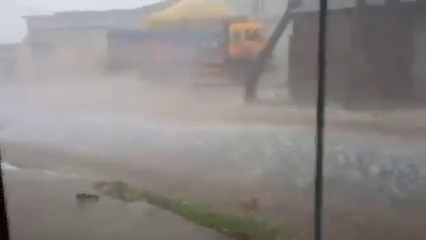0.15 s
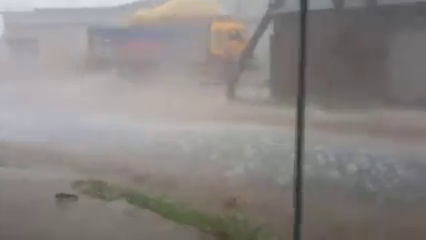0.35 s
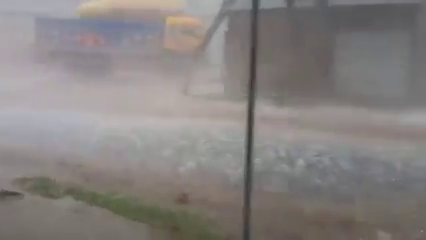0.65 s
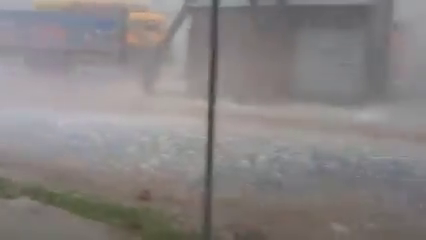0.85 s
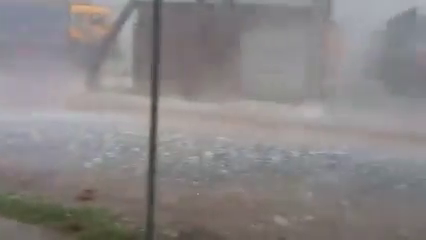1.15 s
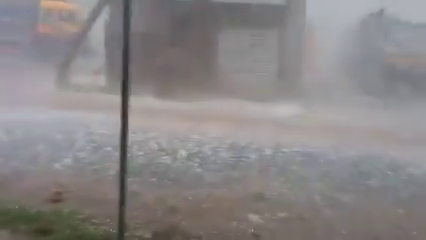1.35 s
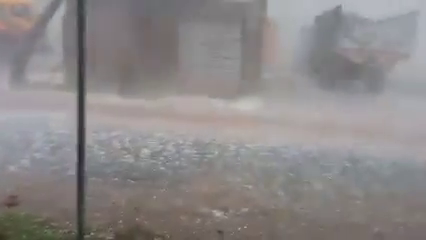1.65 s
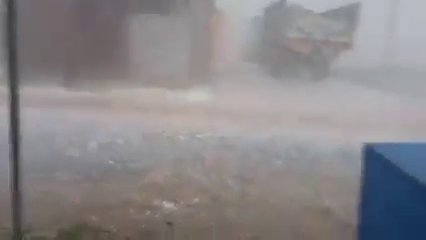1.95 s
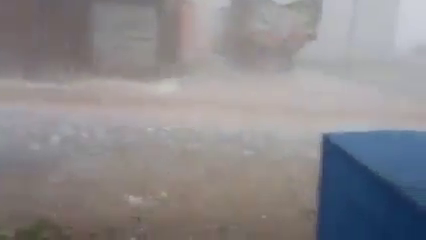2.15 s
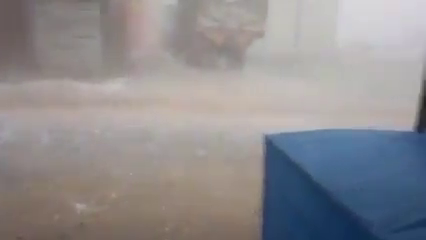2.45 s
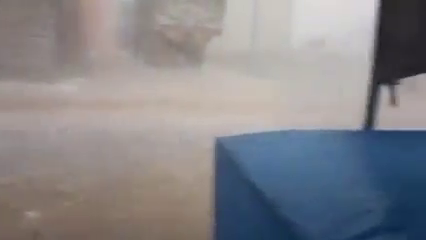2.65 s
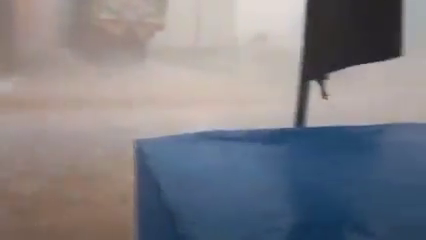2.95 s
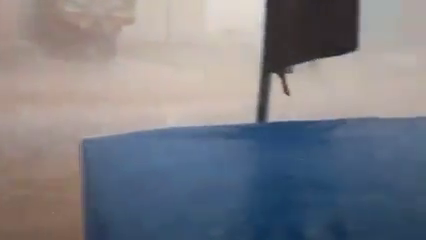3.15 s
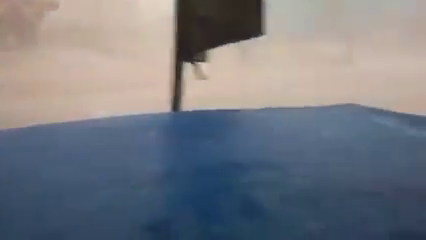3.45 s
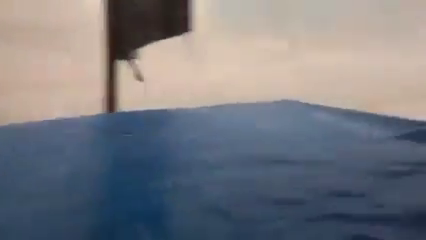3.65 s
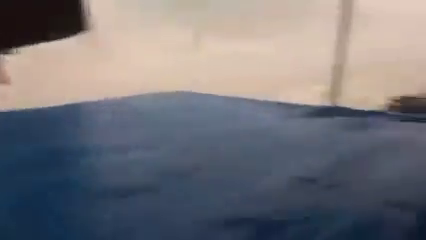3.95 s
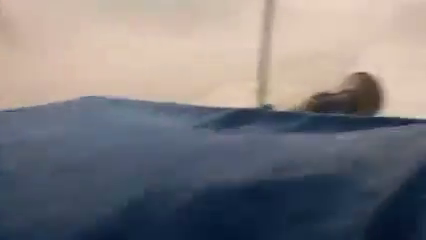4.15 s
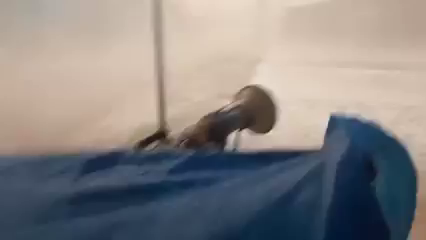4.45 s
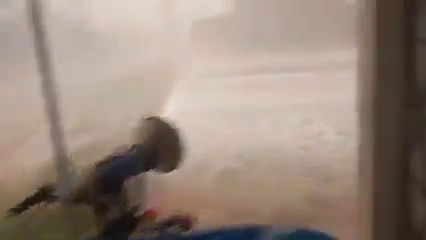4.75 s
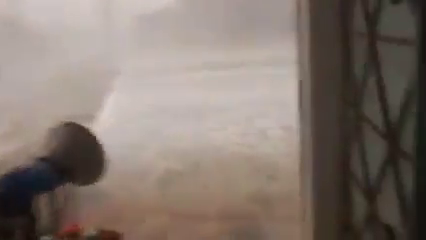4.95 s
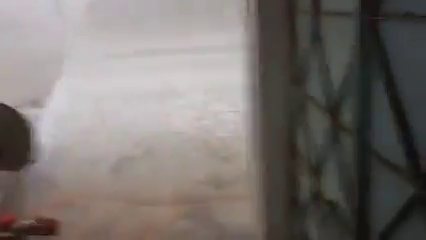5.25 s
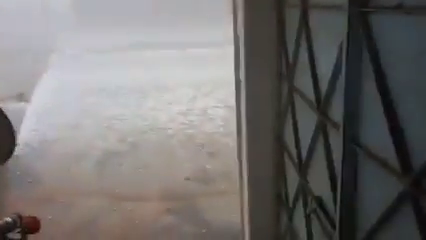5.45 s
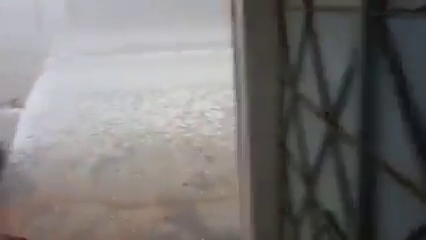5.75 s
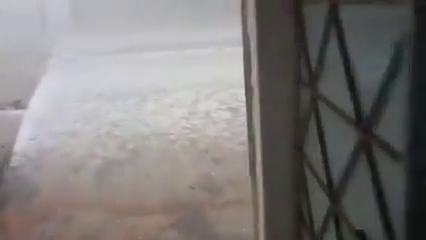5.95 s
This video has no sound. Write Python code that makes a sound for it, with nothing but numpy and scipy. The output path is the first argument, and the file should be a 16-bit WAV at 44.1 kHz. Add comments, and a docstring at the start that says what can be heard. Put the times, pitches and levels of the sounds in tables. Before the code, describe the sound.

A hailstorm is already at full force at 0 seconds: countless stones and drops on yard and roof blend into a dense, grainy mid-range roar, with low roof drumming underneath and a thin, shimmering treble hiss above. It flutters in small gusts but never stops. A dull thud lands near 0.4 seconds, and sparse bright cracks follow among tiny random ticks. A harder knock comes around 2.6, then more at 3.4. Near 4 seconds a deep rumble swells briefly and sinks, with thuds beside it. From about 4.7 the storm eases a little, while close stones hit tarpaulin and door ever more thickly, snapping, knocking and thudding in quick irregular clusters until the abrupt end just after 6 seconds. The stereo image leans clearly right; the handheld microphone sounds coarse, slightly resonant in the upper middle, dulled at the very top and clipped on peaks.

```python
"""The mouth of a sheet-metal shed in a hailstorm that eases in gusts, the balance always leaning right.
Dense random clicks, coloured by spectrum, make the roar on yard and roof, the drumming and a deep rumble;
brief thin tones shimmer in the treble. Noise bursts crack, knock and thud close by. In the upper middle
two narrow resonances dip the left and lift the right; the top is cut and peaks beyond full scale clip."""
import sys
import numpy as np
from scipy import signal
from scipy.fft import rfft, irfft, next_fast_len
from scipy.io import wavfile

SR = 44100
rng = np.random.default_rng(int(sys.argv[2]) if len(sys.argv) > 2 else 0)


def dump(signal):
    """Clip the signal to [-1, 1] and save it as 16-bit WAV at the path in sys.argv[1]."""
    limited = np.clip(np.atleast_2d(signal).T, -1, 1)
    pcm = np.round(limited * 32767).astype(np.int16)
    wavfile.write(sys.argv[1], SR, pcm)


N = 268128


def from_db(db):
    """Amplitude gain of a level in dB."""
    return 10 ** (np.asarray(db) / 20)


def rms_one(x):
    """Scale to rms 1."""
    return x / np.sqrt(np.mean(x ** 2) + 1e-20)


def at_hz(points, hz):
    """Read a spectrum table with straight lines on a log-frequency axis."""
    table_hz, values = np.transpose(points)
    return np.interp(np.log(hz), np.log(table_hz), values)


def in_time(rows):
    """Turn the columns of a timed table into curves over the whole scene."""
    s, *columns = np.transpose(rows)
    return [np.interp(np.arange(N) / SR, s, column) for column in columns]


def drift(corner_hz):
    """Slow random wander of rms 1: noise through two equal one-pole low-passes."""
    step = 40   # samples per control value
    run_in = 2000   # control values
    r = np.exp(-2 * np.pi * corner_hz * step / SR)
    noise = rng.standard_normal(N // step + run_in + 2)
    slow = signal.lfilter([1], [1, -2 * r, r * r], noise)[run_in:]
    return np.interp(np.arange(N) / step, np.arange(len(slow)), rms_one(slow))


def pan(db):
    """Left and right gains for a level difference, left minus right."""
    return from_db(np.array([db / 2, -db / 2]))


def impacts(per_s, spread_db):
    """Three independent showers of clicks, mostly small with a few much larger, of either sign."""
    size_db = spread_db * np.minimum(rng.exponential(1, (3, N)), 3.5)
    clicks = from_db(size_db) * rng.choice([-1, 1], (3, N))
    return clicks * (rng.random((3, N)) < per_s / SR)


def shimmer(low_hz, high_hz, per_s, spread_db):
    """Three swarms of brief thin tones at chance pitches: the treble shimmers, not an even hiss."""
    hop, size = 256, 2048   # samples
    peak_s = 0.014   # sets how slowly a tone swells and fades
    steps = np.arange(N // hop + 12)
    slots = np.arange(int(low_hz * size / SR), int(high_hz * size / SR))   # one pitch each
    luck = rng.random((3, len(steps), len(slots))) / (per_s * hop / SR / len(slots))
    struck = luck < 1   # a tone starts here; the smaller the draw, the louder
    loudness = from_db(-spread_db * np.log(np.maximum(luck[struck], .03)))
    start = np.full(luck.shape, 1e-18 + 0j)
    start[struck] = loudness * np.exp(2j * np.pi * rng.random(struck.sum()))

    r = np.exp(-hop / (peak_s * SR))   # a double pole: each tone swells, then fades
    swelling = signal.lfilter([1], [1, -2 * r, r * r], start, axis=1)
    # advancing phase keeps every sine unbroken from step to step
    turning = np.exp(2j * np.pi * np.outer(steps, slots) * hop / size)
    height = np.zeros((3, len(steps), size // 2 + 1), complex)
    height[..., slots] = swelling * turning

    pieces = irfft(height, size)[..., :2 * hop] * np.hanning(2 * hop + 1)[:-1]
    joined = pieces[:, 1:, :hop] + pieces[:, :-1, hop:]
    return joined.reshape(3, -1)[:, -N:]   # the first steps are a run-in


def stereo(sources, spectrum):
    """One source reaches both ports (the left a little late), one each port alone; coloured, mid rms 1."""
    # how much the two ports hear alike: [f/Hz, shared part 0-1]
    likeness = [(100, 0.04), (270, 0.28), (450, 0.52), (800, 0.37), (1200, 0.11), (3000, 0.06), (8000, 0),
                (12000, 0.04)]
    # balance across the spectrum: [f/Hz, left minus right/dB]
    side_tilt = [(60, 4), (125, 3), (250, 4), (700, 5), (1800, 4), (2700, 1), (5000, 4.5), (9800, 5),
                 (13000, 2.7)]
    left_lag_s = .00015
    size = next_fast_len(N)
    hz = np.maximum(np.fft.rfftfreq(size, 1 / SR), 1)
    both, left, right = rfft(sources, size)
    alike = np.clip(at_hz(likeness, hz), 0, 1)
    late = np.exp(-2j * np.pi * hz * left_lag_s)
    shared = np.sqrt(alike) * both * [late, late ** 0]
    pair = shared + np.sqrt(1 - alike) * np.array([left, right])
    inside = (hz > spectrum[0][0]) & (hz < spectrum[-1][0])
    colour = inside * from_db(at_hz(spectrum, hz))
    out = irfft(pair * colour * pan(at_hz(side_tilt, hz)), size)[:, :N]
    return out / out.mean(axis=0).std()


def sheet(sources, spectrum, gust_db):
    """A coloured stereo sheet of sound, thickening and thinning with the gusts."""
    return from_db(gust_db) * stereo(sources, spectrum)


def roof_drum(level_db):
    """The roof drums under the hail: dense clicks coloured toward the low middle."""
    # drumming spectrum: [f/Hz, level/dB per Hz]
    drum_colour = [(18, -54), (30, -40), (71, -6.5), (102, 0), (134, -0.5), (173, -5.5), (254, 0),
                   (900, -5.5), (1170, -30), (1980, -120)]
    return from_db(level_db) * sheet(impacts(3000, 2.87), drum_colour, 0.22 * drift(10.0))


def deep_rumble(level_db):
    """Sparser clicks coloured to the lowest octaves give an uneven rumble."""
    # rumble spectrum: [f/Hz, level/dB per Hz]
    rumble_colour = [(35, -24), (60, -4.5), (100, 3), (135, -5), (180, -25)]
    return from_db(level_db) * sheet(impacts(300, 2.9), rumble_colour, 1.4 * drift(5.0))


def hail_roar(strength_db):
    """Countless stones and drops on yard and roof blend into a mid-range roar."""
    # roar spectrum: [f/Hz, level/dB per Hz]
    roar_colour = [(500, -11.5), (800, -10.5), (1000, -5), (1500, 0.5), (2100, 0), (2600, -9.5),
                   (3300, -15), (4500, -25.5)]
    roar = sheet(impacts(14000, 3.15), roar_colour, 0.52 * drift(8.9))
    return from_db(-17.5 + strength_db) * roar


def lower_shimmer(treble_db, treble_gust):
    """Brief thin tones shimmer from the upper middle to the lower treble."""
    # lower shimmer spectrum: [f/Hz, level/dB per Hz]
    lower_colour = [(1800, -7.5), (2500, 1.5), (3500, -5), (5000, -7.5), (6300, -11.5), (7500, -10.5),
                    (7800, -34)]
    tones = shimmer(1800, 7800, 1900, spread_db=3.5)
    return from_db(-23.5 + treble_db) * sheet(tones, lower_colour, 0.23 * treble_gust)


def upper_shimmer(treble_db, treble_gust):
    """Brief thin tones shimmer at the top, swinging more widely than the lower ones."""
    # upper shimmer spectrum: [f/Hz, level/dB per Hz]
    upper_colour = [(6500, -39), (7700, -3), (9000, 0.5), (10600, -3.5), (11200, -0.5), (13000, 0),
                    (15100, -2), (15250, -12), (16000, -13)]
    follows = 1.2   # dB per dB of treble
    tones = shimmer(6500, 16000, 4000, spread_db=4.0)
    return from_db(-36 + follows * treble_db) * sheet(tones, upper_colour, 0.97 * treble_gust)


def bursts(times, levels_db, rise_s, t60_s):
    """Envelope of sudden bursts: a straight rise times an exponential decay, shared by all."""
    out = np.zeros(N)
    t = np.arange(SR // 4) / SR
    shape = from_db(-60 * t / t60_s) * np.minimum(t / rise_s, 1)
    for s, db in zip(times, levels_db):
        at = round(s * SR)
        out[at:at + len(t)] += from_db(db) * shape[:N - at]
    return out


def small_stones():
    """Envelope of small stones at random: each jumps up at once and decays exponentially."""
    per_s, floor_db, t60_s = 40, -50.5, 0.092
    hits = np.abs(impacts(per_s, spread_db=4.5)[0]) * from_db(floor_db)
    return signal.lfilter([1], [1, -from_db(-60 / (t60_s * SR))], hits + 1e-18)


def near_stones():
    """Stones shatter in bright noise bursts, heavy ones knock and thud; smaller ones fall at random."""
    # stones shattering close by: [t/s, burst level before decay/dB]
    shattering = [(0.2334, -30), (0.415, -26.5), (0.6994, -31.5), (1.2426, -31.5), (1.5534, -24),
                  (1.9784, -35), (2.3294, -32.5), (2.4124, -29), (3.2794, -29), (3.5394, -26),
                  (3.704, -25.5), (3.8018, -24), (4.3814, -29.5), (4.4844, -29), (4.7356, -27.5),
                  (4.8524, -29), (4.9013, -33), (4.9641, -27), (5.01, -29), (5.1033, -29), (5.1794, -30.5),
                  (5.3033, -31.5), (5.3894, -30.5), (5.4176, -27.5), (5.4929, -29), (5.7114, -28.5),
                  (5.755, -21.5), (5.9115, -25.5), (5.9594, -30.5), (5.9798, -27.5), (5.9954, -28)]
    # heavy stones knocking on the tarpaulin and door: [t/s, knock level/dB, thud level/dB]
    heavy = [(0.38, -26, -13), (2.575, -16, -16), (3.403, -12.5, -24), (3.43, -20, -15.5),
             (4.0264, -19, -15), (4.11, -20, -19.5), (4.379, -20, -18), (4.7373, -15, -26),
             (4.7894, -21, -21.5), (4.9, -19, -15), (4.967, -13, -17), (5.01, -18, -20),
             (5.102, -12.5, -10), (5.179, -15, -12), (5.376, -21, -16), (5.394, -14, -20),
             (5.416, -14, -13.5), (5.4924, -18, -16), (5.6544, -14, -22.5), (5.7525, -15.5, -15),
             (5.8804, -14, -20.5), (5.912, -11, -20.5), (5.9607, -12.5, -26), (5.995, -15.5, -17.5),
             (6.051, -15, -20)]
    # bright shatter spectrum: [f/Hz, level/dB per Hz]
    crack_colour = [(5000, -7), (8000, -4), (11000, 2), (14000, 4), (15100, 0), (15250, -11), (16000, -12)]
    # mid-range knock spectrum: [f/Hz, level/dB per Hz]
    knock_colour = [(600, -1), (1000, 1), (2000, 2), (3200, -2), (7500, -20.5), (9000, -23)]
    # low thud spectrum: [f/Hz, level/dB per Hz]
    thud_colour = [(80, -10), (200, 7.5), (500, 5), (900, -7), (1400, -24)]
    small = small_stones()
    white = rng.standard_normal((3, N))
    side = pan(-6)[:, None]   # listed stones lean right
    heavy_s, knock_db, thud_db = np.transpose(heavy)
    crack = side * bursts(*np.transpose(shattering), rise_s=0.0035, t60_s=0.085) + small
    knock = side * bursts(heavy_s, knock_db, rise_s=0.0011, t60_s=0.054)
    knock = knock + from_db(9) * small   # small stones have more body than crack
    thud = side * bursts(heavy_s, thud_db, rise_s=0.004, t60_s=0.093)
    out = crack * stereo(white, crack_colour)
    out += knock * stereo(white, knock_colour)
    return out + thud * stereo(white, thud_colour)


def scene():
    """Sum the sheets of the storm, swung by the turning microphone, with the near stones."""
    # the storm eases in gusts while the microphone turns:
    # [t/s, strength/dB, extra treble/dB, left minus right/dB]
    storm = [(0.0, 1.5, -1.5, -5), (0.23, 1, 0, -6), (0.7, 1.5, 0.5, -5), (0.95, 1.5, -.5, -6),
             (1.42, 0, -0.5, -7.5), (1.72, 0, -1, -7), (2.0, 1, -0.5, -6.5), (2.47, 0.5, .7, -6.5),
             (2.9, .5, -0.8, -7), (3.22, 0.5, 0.5, -6.5), (3.71, 0.5, -0.6, -6.5), (4.1, 0.7, -1.5, -6),
             (4.36, 0.1, 0, -5.5), (4.58, 0.5, -3, -6.5), (4.95, -1.9, 0.5, -5.5), (5.25, -2, -1.3, -5),
             (5.75, -1, 0.1, -5), (6.08, -2, -0.5, -6)]
    # low drumming, with one swell before it sinks: [t/s, drum level/dB, deep rumble level/dB]
    low_swell = [(0.0, -20.5, -36), (1.0, -20, -37), (2.0, -21, -40), (2.9, -21, -40), (3.22, -20.5, -40),
                 (3.71, -21, -37), (3.99, -18, -27), (4.15, -21, -30), (4.6, -21.5, -34),
                 (4.95, -23.5, -32.5), (5.3, -23.5, -41), (6.08, -22, -33.5)]
    strength_db, treble_db, pan_db = in_time(storm)
    drum_db, rumble_db = in_time(low_swell)
    treble_gust = drift(9.4)   # both shimmers waver together
    low = roof_drum(drum_db) + deep_rumble(rumble_db)
    roar = hail_roar(strength_db)
    treble = lower_shimmer(treble_db, treble_gust) + upper_shimmer(treble_db, treble_gust)
    sheets = low + roar + from_db(strength_db) * treble
    return pan(pan_db) * sheets + near_stones()


def record(dry):
    """Two narrow resonances dip the left and lift the right, peaks clip, a steep low-pass cuts the top."""
    # upper-middle microphone resonances: [f/Hz, width/Hz, left gain/dB, right gain/dB]
    mic_modes = [(1540, 84, -5.5, 4), (2053, 41, -4.5, 6.5)]
    out = dry.copy()
    for hz, width_hz, *gain_db in mic_modes:
        r = np.exp(-np.pi * width_hz / SR)
        zeros = [(1 - r * r) / 2, 0, (r * r - 1) / 2]
        poles = [1, -2 * r * np.cos(2 * np.pi * hz / SR), r * r]
        ringing = signal.lfilter(zeros, poles, dry)
        out += (from_db(gain_db)[:, None] - 1) * ringing   # a negative gain makes a dip
    overloaded = np.clip(out, -1, 1)
    cutoff_hz = 15730
    steep = signal.ellip(14, .5, 70, cutoff_hz, fs=SR, output="sos")
    return np.clip(signal.sosfilt(steep, overloaded), -1, 1)


dry = scene()
out = record(dry)
dump(out)
```